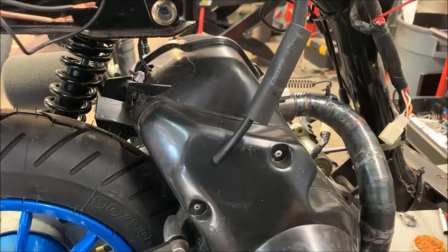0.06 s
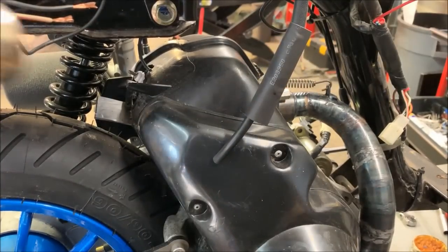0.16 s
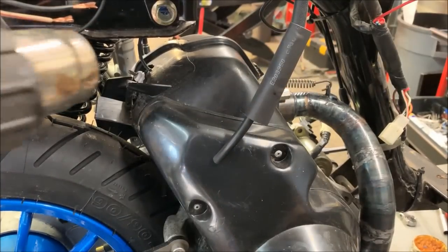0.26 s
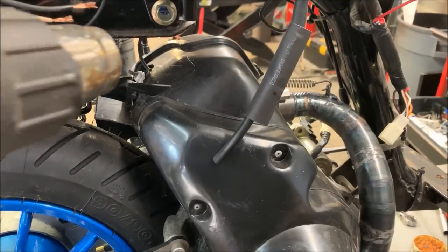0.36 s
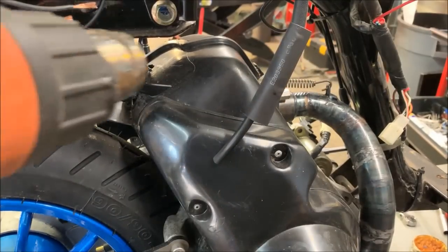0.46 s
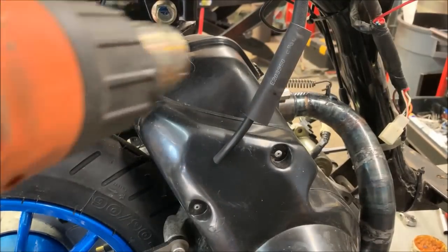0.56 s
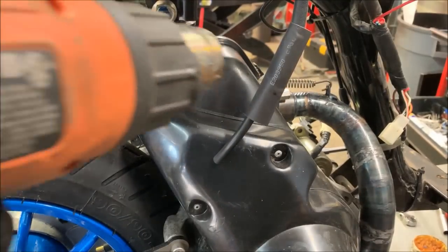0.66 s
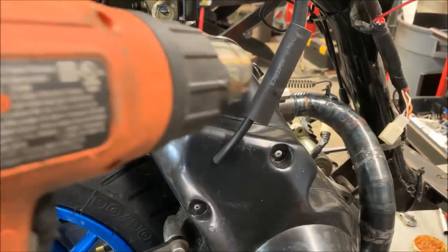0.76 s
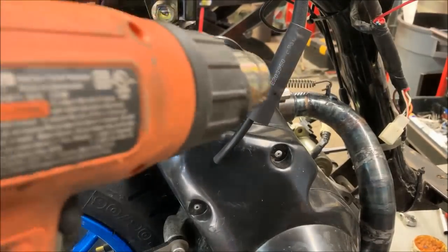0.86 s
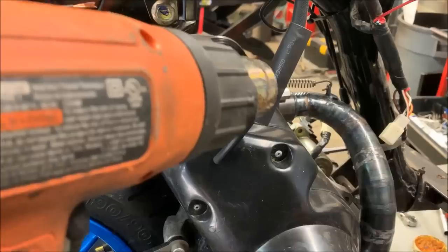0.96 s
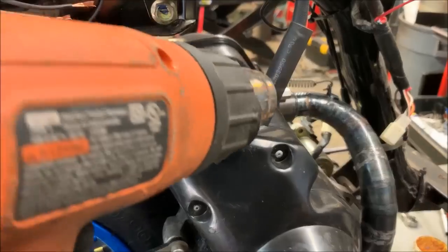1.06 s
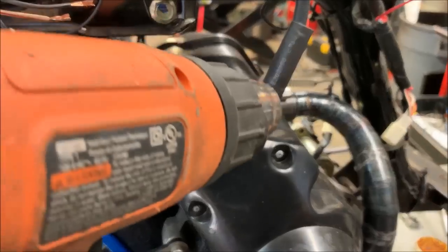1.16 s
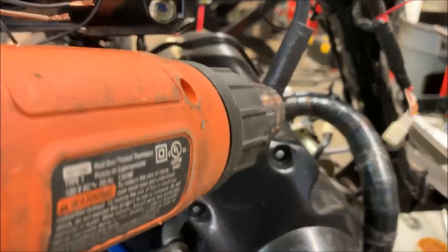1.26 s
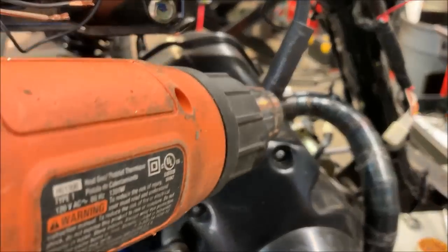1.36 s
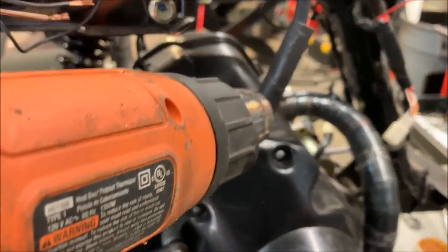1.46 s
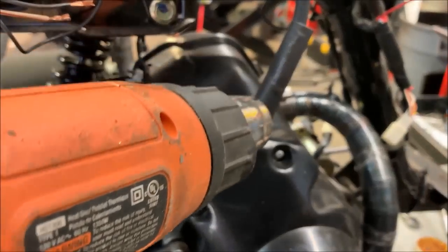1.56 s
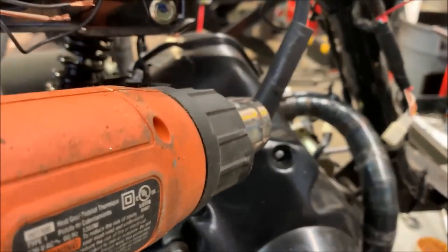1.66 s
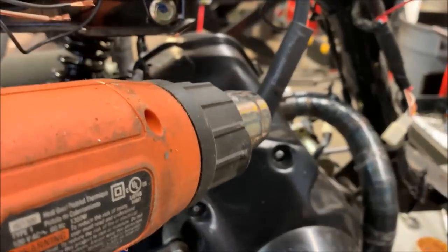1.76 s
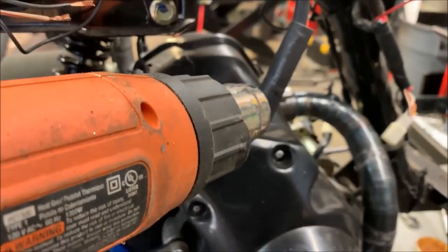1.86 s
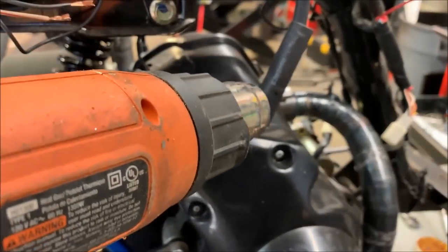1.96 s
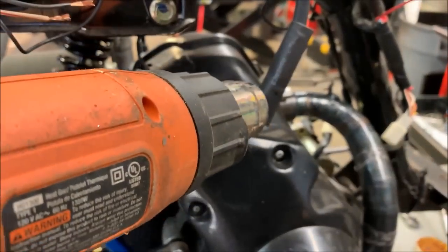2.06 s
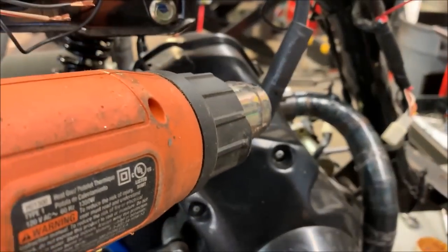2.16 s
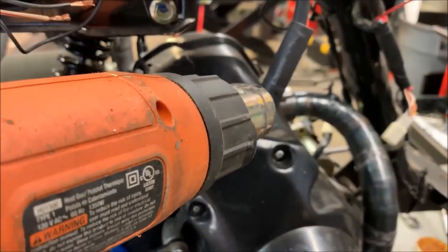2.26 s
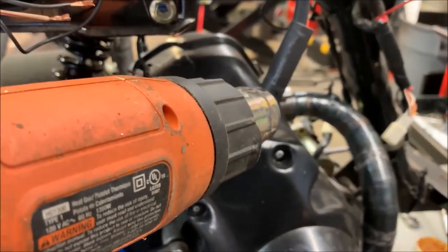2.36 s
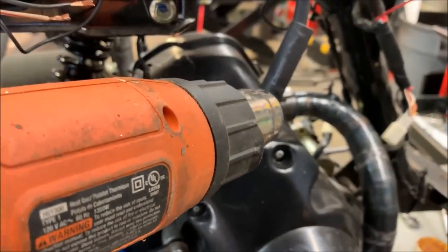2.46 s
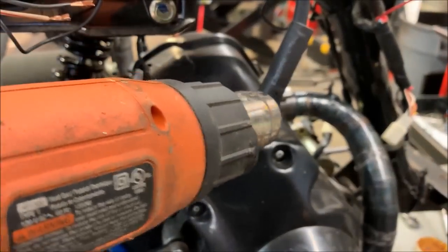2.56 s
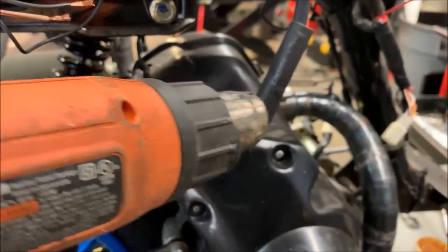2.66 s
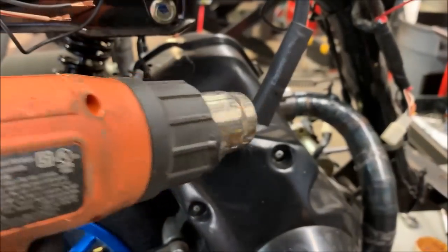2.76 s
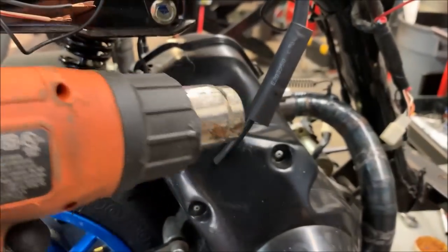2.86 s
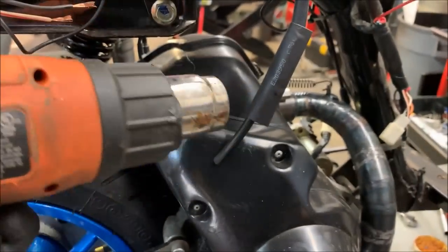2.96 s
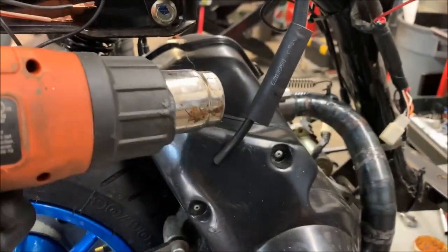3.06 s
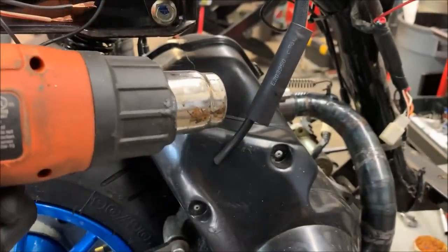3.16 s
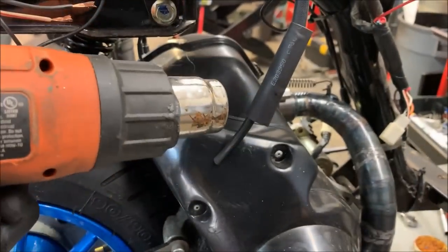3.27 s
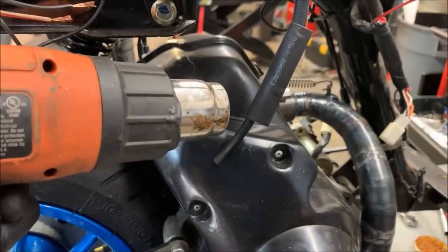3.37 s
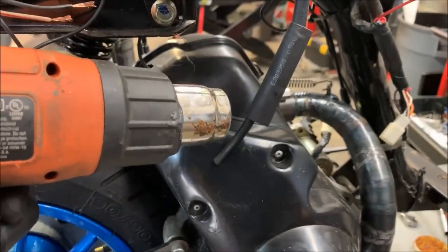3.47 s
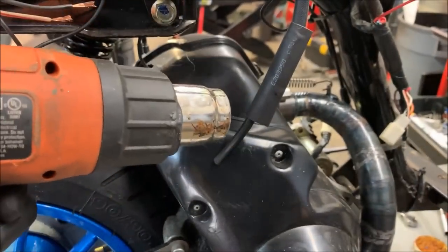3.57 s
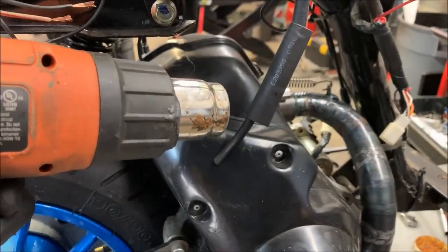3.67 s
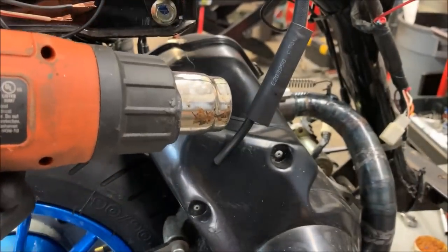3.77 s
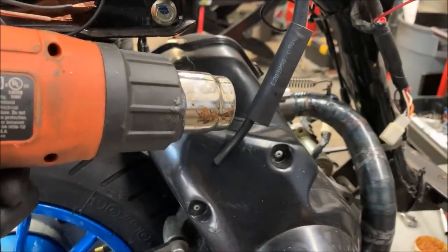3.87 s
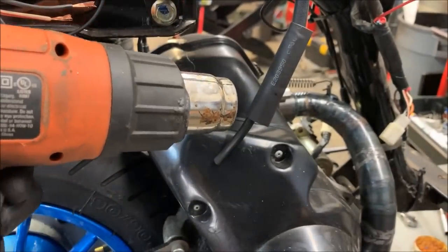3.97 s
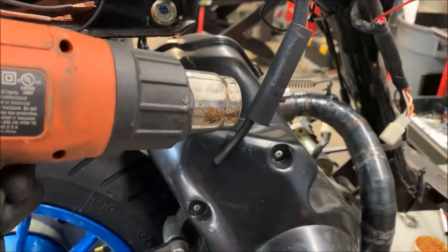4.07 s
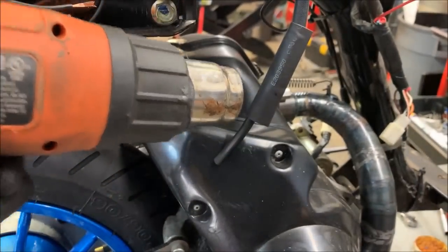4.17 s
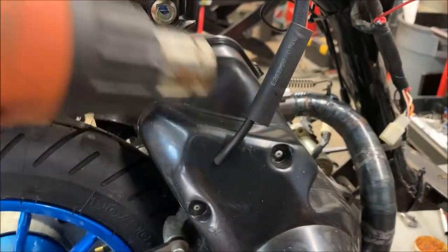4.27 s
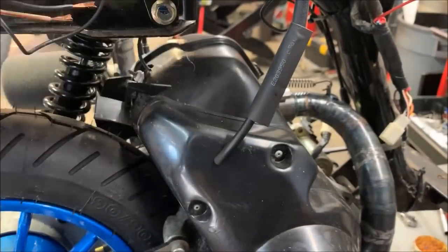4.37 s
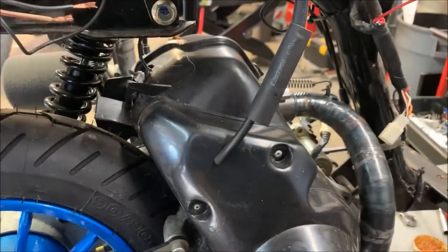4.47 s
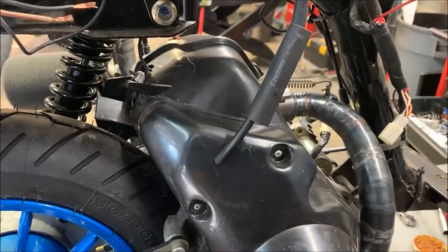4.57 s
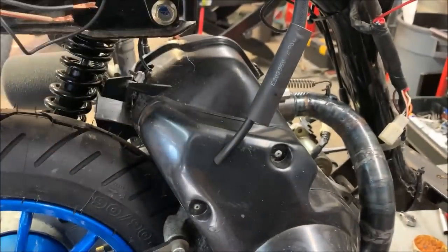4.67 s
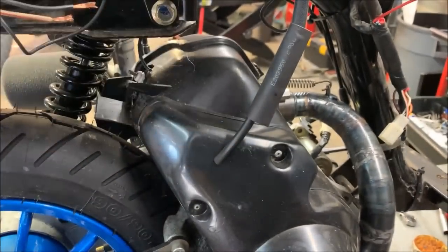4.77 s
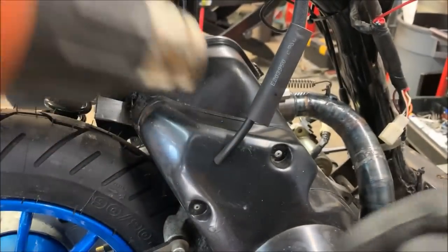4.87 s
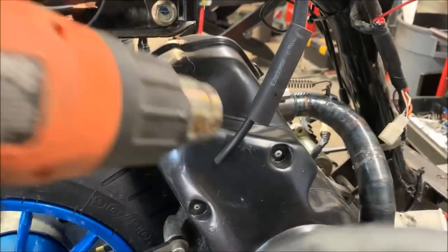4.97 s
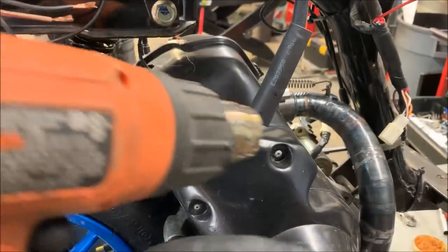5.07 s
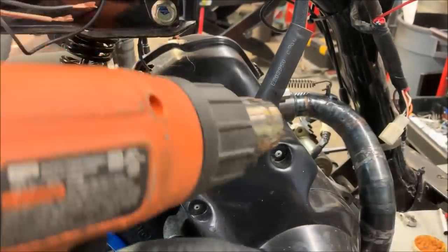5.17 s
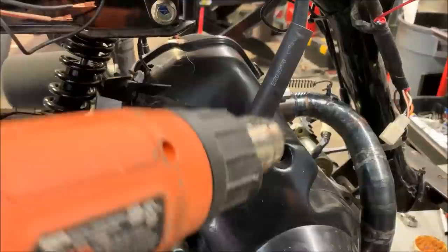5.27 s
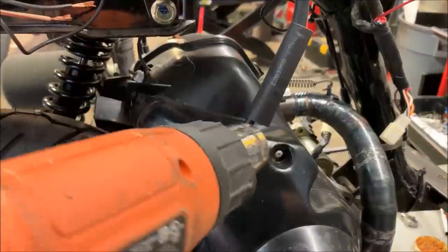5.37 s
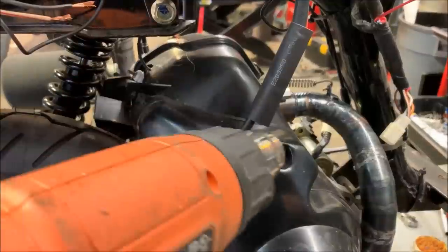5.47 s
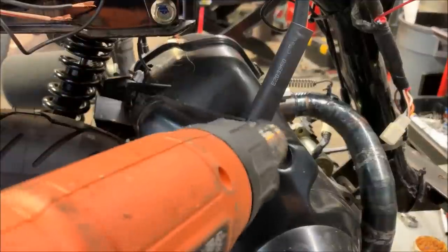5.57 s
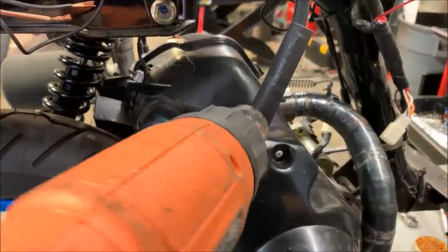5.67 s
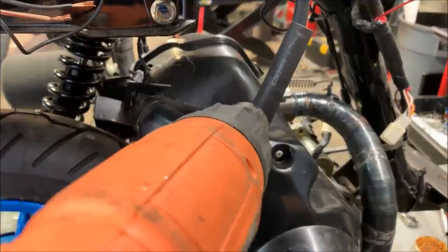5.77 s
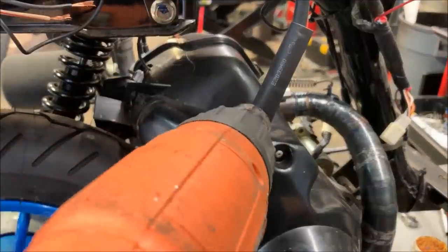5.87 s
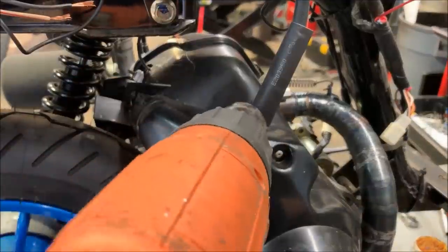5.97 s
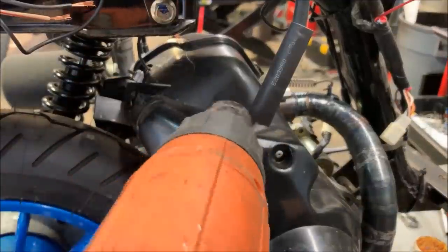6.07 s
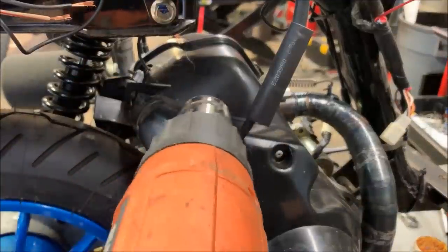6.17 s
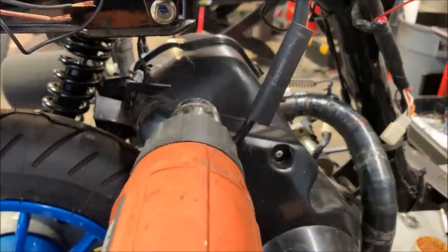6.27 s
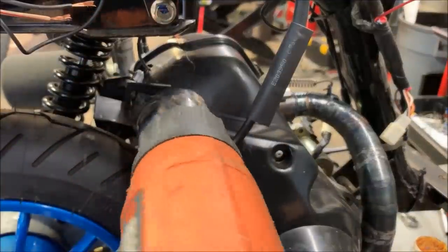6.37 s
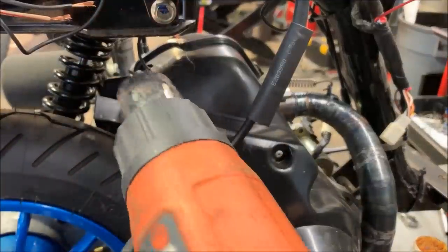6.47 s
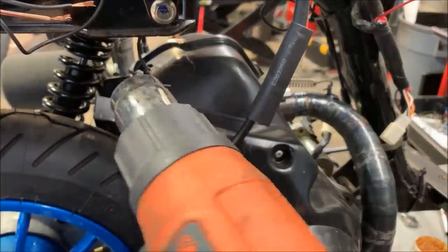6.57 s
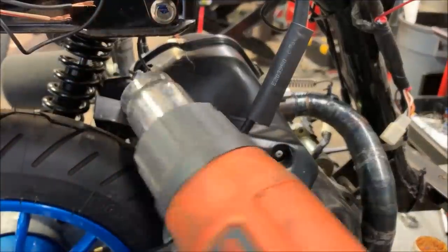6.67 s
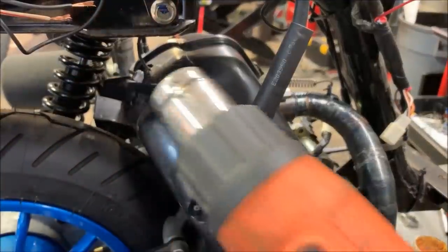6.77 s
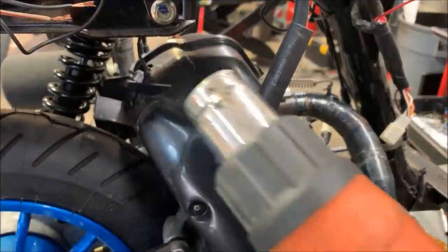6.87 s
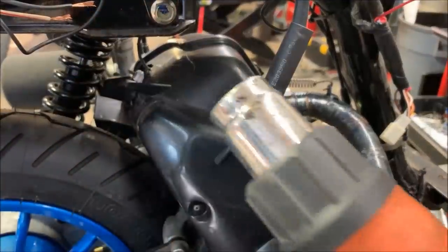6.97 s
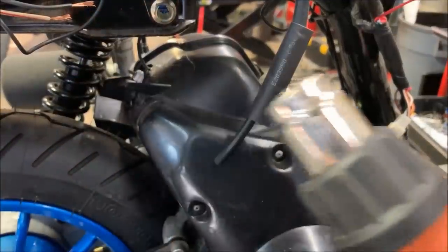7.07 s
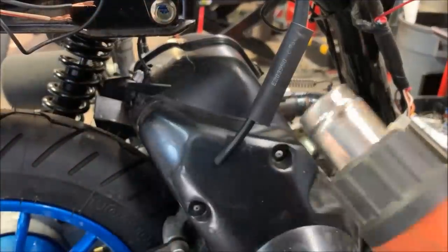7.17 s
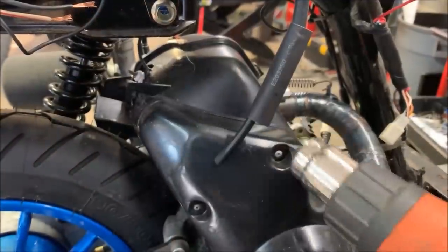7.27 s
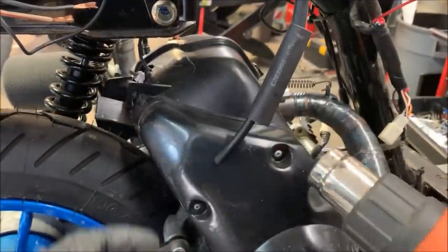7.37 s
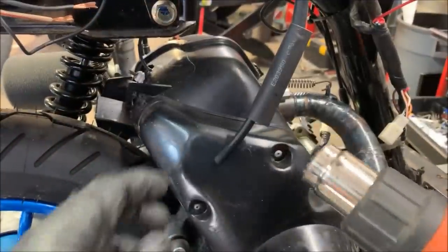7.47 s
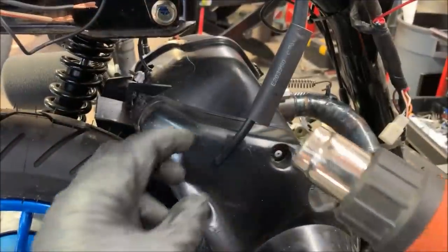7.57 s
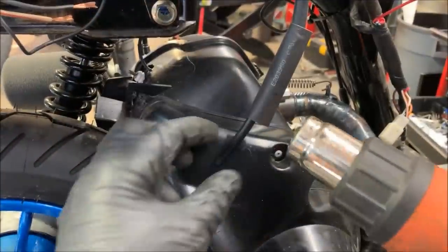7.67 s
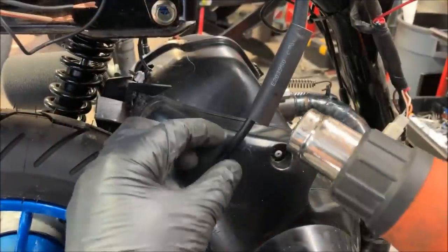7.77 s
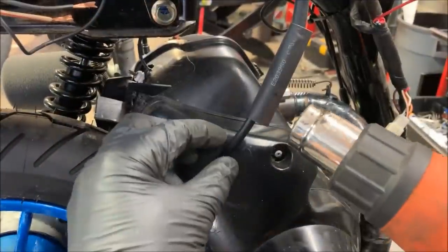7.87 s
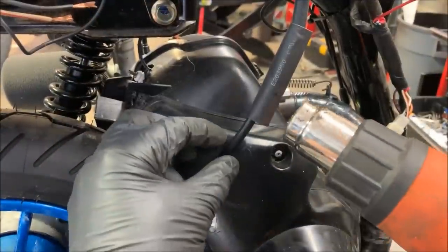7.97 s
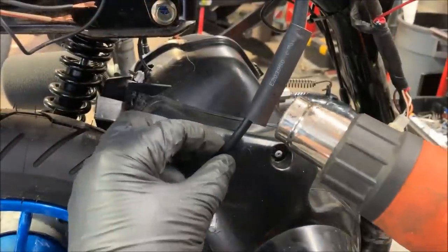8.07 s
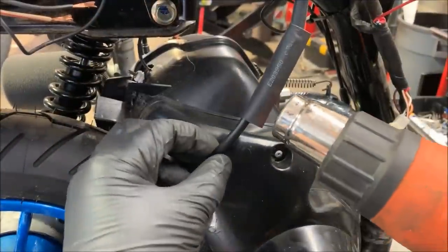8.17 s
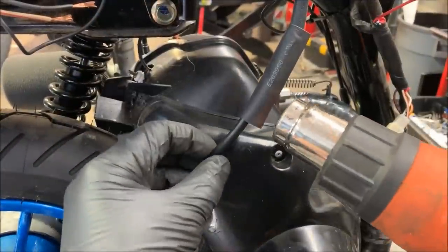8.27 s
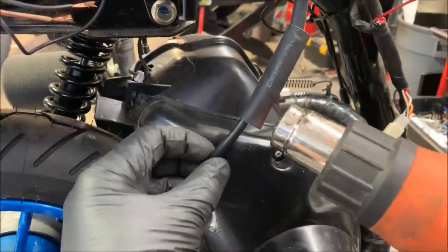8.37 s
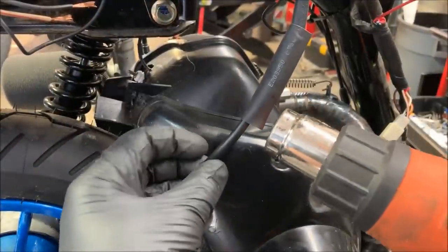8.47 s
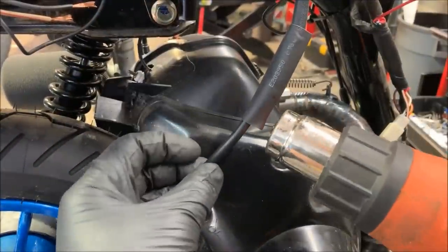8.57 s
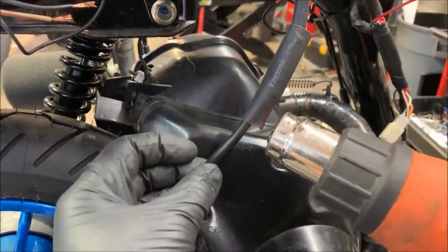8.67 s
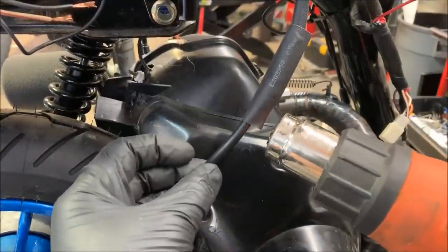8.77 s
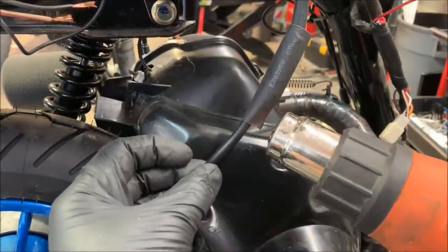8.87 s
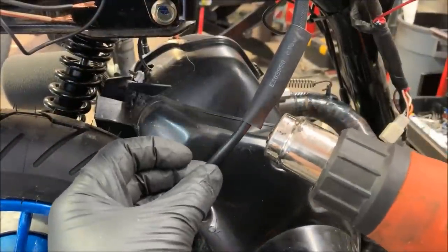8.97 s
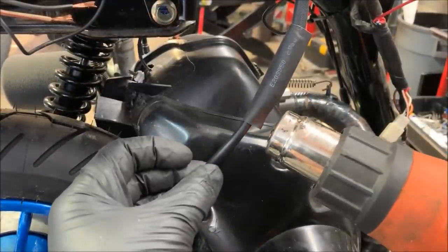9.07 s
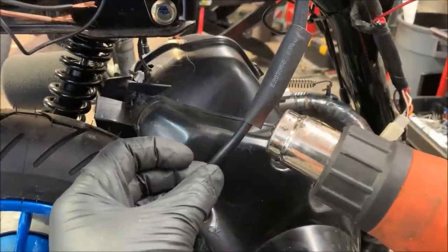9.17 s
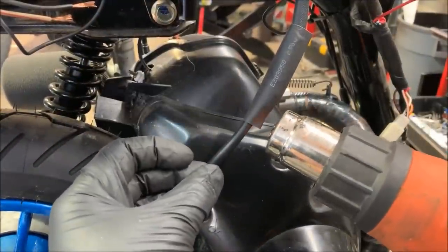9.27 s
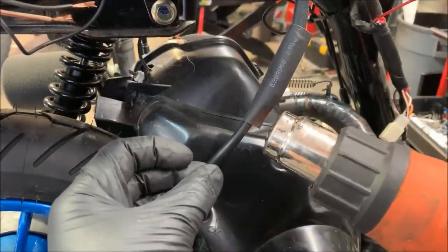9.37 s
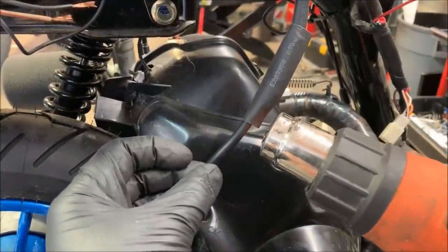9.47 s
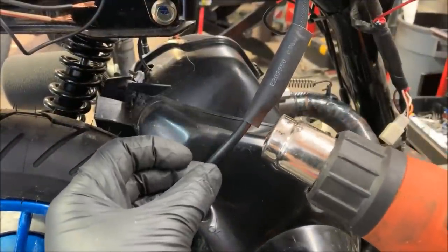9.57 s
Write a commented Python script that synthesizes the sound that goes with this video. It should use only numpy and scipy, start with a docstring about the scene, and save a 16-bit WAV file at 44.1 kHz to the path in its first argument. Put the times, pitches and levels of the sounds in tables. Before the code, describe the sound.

A heat gun switches on very near the microphone and its fan climbs quickly to full speed. The steady blowing noise mixes a hollow mid-range roar, bright hiss, a humming motor with a thin whine and a faint piercing squeal. Moving the tool around makes the colour swell, thin and swing mostly from left toward centre and right. Later it holds steady, with soft low puffs of air bumping the microphone, in a dry workshop.

```python
"""A hand-held electric heat gun spins up and blows, close to a two-port microphone in a quiet workshop.
Its turbulent air is noise shaped by barrel, intake, housing and nozzle resonances; shaft, blade and
commutator tones are sines at multiples of the shaft speed. A thin squeal of narrow noise sits on top.
The gun is carried around the microphone: each part swells and changes side. Below lie mains ripple,
a drone, a deep hum, puffs and buffeting on the microphone and the still room."""
import sys
import numpy as np
from scipy import signal
from scipy.io import wavfile
from scipy.ndimage import uniform_filter1d

SR = 44100
rng = np.random.default_rng(int(sys.argv[2]) if len(sys.argv) > 2 else 0)


def bounce(signal):
    """Save signal as a 16-bit WAV file at the path given by the first command-line argument."""
    frames = np.transpose(np.atleast_2d(signal))
    limited = np.clip(frames, -1, 1)
    pcm = np.round(limited * 32767).astype(np.int16)
    wavfile.write(sys.argv[1], SR, pcm)


N = 424241
SIZE, HOP = 1024, 256  # noise frames, samples
HZ = np.fft.rfftfreq(SIZE, 1 / SR)
FRAME_S = np.arange(N // HOP + 5) * HOP / SR
TIME = np.arange(N) / SR

# Place: air buffeting the microphone and the hum of the shop: t/s, level/dB
RUMBLE = [(0.0, -44.5), (1.42, -59), (1.71, -40.5), (3.83, -53), (3.99, -43), (4.07, -48), (5.57, -44.5),
          (6.78, -49), (8.09, -42), (8.14, -41), (8.28, -45), (8.33, -42), (9.03, -46), (9.62, -46)]
# spectrum of that buffeting: f/Hz, relative level/dB per Hz
RUMBLE_COLOUR = [(8.8, -35), (15, -5), (43, 6), (140, -1.5), (168, -25), (200, 6.5), (260, -9), (440, -120)]
# spectrum of the still room: f/Hz, relative level/dB per Hz
ROOM_COLOUR = [(76, -33), (130, -44), (307, -18.5), (1020, -28.5), (1220, -31), (2410, -23), (15500, -46.5)]
ROOM_DB = -49
# puffs of air on the microphone: t/s, peak level/dB, f/Hz
PUFFS = [(7.99, -40, 59.7), (8.136, -31, 49.4), (8.165, -32, 59.5), (8.245, -35, 90.2), (8.364, -24, 70),
         (8.383, -32, 49.9), (8.42, -29, 88.4), (8.5, -31, 80.5), (8.54, -38, 59.8), (8.665, -34, 50),
         (8.695, -27, 70.1), (8.845, -38, 50.3)]

# Stereo image of the hiss by pitch:
# f/Hz, left leads/rad, rms wander of the lead/rad, likeness of left and right/0-1
STEREO = [(0, 0, 0, .9), (500, .1, .1, .9), (1000, .2, .3, .9), (2200, 2.4, .4, .85), (3600, 1.6, .5, .75),
          (5000, 3.6, .8, .55), (6200, 4.2, 1.2, .5), (7300, 3, .8, .5), (8200, 1.3, .3, .6),
          (9000, .15, 0, .97), (9400, -.15, 0, .97), (10200, -1.5, 0, .5), (11100, -3, 0, .985),
          (11700, -3.3, 0, .985), (12500, -4.7, 0, .5), (13200, -6.15, 0, .995), (14000, -6.4, 0, .995),
          (14600, -7.7, 0, .55), (15100, -8.7, 0, .97), (15500, -9.3, 0, .85), (16000, -9.5, 0, .9)]
EDGE_HZ = 15790  # upper band limit of the recorder

# Distance and aim: how fast the hand carries the gun about: t/s, speed/0-1
HAND = [(0, 0.48), (1.1, 0.55), (1.3, 0.29), (2.6, 0.03), (2.85, 0.47), (3.1, 0.09), (4.1, 0.17),
        (4.35, 0.99), (5.3, 0.84), (5.7, 0.3), (6.4, 0.28), (6.6, 1), (7.5, 0.94), (7.7, 0.01), (9.62, 0)]
# where the parts lie: t/s, L-R level/dB of barrel, intake, housing, left leads/rad of intake, housing, nozzle
BEARING = [(0.3, 10, 10.5, 1, -4.5, -2.5, 0), (1.0, 11, 16, 1, -1, 0.5, -2),
           (1.25, 10, 20, 5.5, -0.5, -2, -4), (2.6, 8, 16, 0.5, 2, 0, -4), (3.15, 8, 9, 9.5, 1, 4, -1),
           (4.1, 7.5, 5.5, 9.5, -2, 4.5, -1.5), (4.3, 8, 7, 5.5, -1.2, 4, -1.5),
           (4.6, 15, 9, 4.5, -2.5, 4.5, 2), (4.85, 15, 10, 8, -8.5, 2.5, 1.5),
           (5.2, 7, 13, 1, -7.5, 1, -2.5), (5.5, 7, 13.5, 6, -8, -0.5, -2.5),
           (5.9, 5.5, 10.5, 7.5, -7, -2, -6), (6.4, 5, 6.5, 3, -5.5, -2.5, -9.5),
           (6.8, 1.5, 2, 4, -7.5, -1.5, -5.5), (7.1, 0, -7, 5, -2, -5, -5), (7.35, -3, -5, 6, -5.5, -6, -6),
           (7.8, -3.5, -5, 6.5, -5.5, -5, -5), (9.62, -1.5, -4, 5, -4.5, -8.5, -4)]
# ridge and flank: t/s, ridge L-R level/dB, ridge left leads/rad,
# flank level/dB above the jet, flank L-R level/dB, flank left leads/rad
FLANKS = [(0.3, 4, 4.5, -11, 5, 4), (1.0, 4.5, 2, -21, -3, -8.5), (2.6, 2, 1.5, -9, 7, -4),
          (4.1, 5, 1.5, -11, 3, -0.5), (4.55, 0, 1, -12, 5, -2.5), (4.9, 6, 0.5, -9.5, 9, -5.5),
          (5.3, 1, 2, -9, 8, -7.5), (5.8, 12, -0.5, -11, 4, -4), (6.2, 5, -2, -14, 6, -6),
          (6.8, 5, -5.5, -8, 12, -7), (7.3, 3, -11, -12, 2, -6.6), (7.8, 1, -13, -14, -5, -7.5),
          (9.62, 2, -12.5, -12.5, -3, -5.5)]
# turning shifts the housing and nozzle modes and bares the nozzle: t/s, housing f/Hz, housing width/Hz,
# nozzle f/Hz, nozzle width/Hz, nozzle level/dB above the jet
TURN = [(0.2, 1890, 500, 4040, 700, -5), (1.0, 1950, 540, 4180, 700, -2.5), (2.6, 2050, 550, 4150, 800, -7),
        (2.85, 1860, 500, 4230, 800, -5.5), (4.3, 1890, 450, 4373, 700, -6.5),
        (4.4, 1850, 450, 4240, 450, -3), (4.5, 1910, 450, 4100, 450, -3), (4.58, 1920, 450, 4230, 800, -8),
        (4.75, 1801, 600, 4050, 600, -7.5), (4.9, 1770, 600, 4000, 400, -3),
        (4.97, 1800, 600, 4200, 400, -2.5), (5.05, 1830, 600, 4410, 450, -6.5),
        (5.25, 1934, 600, 4240, 800, -10), (5.6, 1814, 500, 4130, 800, -1.5),
        (6.4, 1923, 500, 4080, 900, -1.5), (6.7, 1780, 602, 4200, 1000, 2),
        (7.0, 1830, 500, 4180, 900, -2.5), (7.15, 1810, 400, 4170, 790, -5.5),
        (7.27, 2000, 350, 4000, 804, -8), (7.31, 1603, 450, 4000, 693, -2.5),
        (7.45, 1720, 450, 4170, 800, 1.5), (7.8, 1738, 549, 4200, 800, -9.5),
        (9.62, 1715, 557, 4222, 800, -6)]
# turning shifts the barrel modes and hides the lowest: t/s, f factor, lowest mode level/dB above the barrel
AIM = [(0.15, .98, -12), (0.45, 0.94, -15), (0.7, 0.96, -3), (1.0, 1.04, -6), (2.6, 1.034, -6.5),
       (3.2, 1.016, -9.5), (4.4, 1.005, -7.5), (5.0, 0.98, -4.5), (5.6, 1.04, -8), (6.5, 1.02, -8.5),
       (6.9, 1.06, -14), (7.2, 1.04, -27), (7.6, 1.03, -24), (8.0, 1.036, -28), (9.62, 0.99, -18)]
# offset (dB for a side, rad for a lead) and share of the neighbour's L-R level/dB
JET_SIDE, HISS_SIDE = (1.6, 0.12), (-1.7, 0.099)  # follow the intake
BARREL_LEAD, THIRD_LEAD = (-0.26, 0.12), (-0.3, 0.1)  # follow the barrel, as do the sides below
THIRD_SIDE, WHINE_SIDE, LOWEST_SIDE = (-5, 2.4), (-2, 0.44), (0, 0.092)
JET_LEAD, THIN_LEAD = 1.84, 1.4  # left leads, rad

# Mains ripple in the motor: t/s, ripple level/dB, twice the ripple level/dB, shaft minus ripple level/dB
RIPPLE = [(0.5, -64, -60, -62), (1.0, -63, -60, -53), (2.2, -51.5, -59, -51.5), (2.9, -54, -58, -55),
          (3.3, -62, -60, -54), (4.2, -60, -57, -57), (4.6, -62, -58, -58), (5.3, -57, -50, -51),
          (6.1, -50, -59, -58.5), (7.1, -60, -58, -56), (8.5, -63, -54, -63), (9.62, -59, -57, -64)]
RIPPLE_HZ = 120  # rectified mains
# a low steady drone: t/s, f/Hz, level/dB
DRONE = [(0.3, 78, -58), (1.0, 78, -52), (1.8, 76.6, -48), (2.4, 75.4, -53), (3.1, 74.6, -56),
         (3.5, 74, -70)]
# a deep, fuzzy hum that comes and goes: t/s, level/dB
DEEP = [(1.2, -66), (1.7, -56), (2.5, -45), (2.9, -62), (4.5, -62), (5.0, -47), (5.6, -50), (6.0, -66),
        (9.62, -66)]
DEEP_HZ, DEEP_WIDTH_HZ = 48.5, 11

# A thin squeal, perhaps the brushes: t/s, level/dB
SQUEAL = [(0.44, -28), (0.55, -30), (1.1, -25), (1.3, -36), (1.5, -50), (1.9, -37), (2.7, -39.5),
          (2.95, -30), (3.3, -35), (3.5, -30), (4.3, -32), (4.7, -58), (5.1, -30), (5.35, -42), (5.9, -39),
          (6.45, -31), (7.05, -45), (7.3, -40), (7.65, -44), (8.1, -37), (9.05, -37), (9.62, -45)]
# pitch of the squeal: t/s, f/Hz
SQUEAL_HZ = [(0, 15092), (2.5, 15065), (5, 15050), (7, 15012), (7.6, 14965), (9.62, 14950)]
# faint ticks of hiss as the motor starts: t/s, length/s, f/Hz, width/Hz, level/dB before the fades
TICKS = [(0.069, .02, 5050, 3000, -43), (.172, 0.0092, 12800, 1200, -45), (.2, .006, 7000, 6000, -58),
         (0.222, .04, 15000, 300, -35), (0.229, .032, 13500, 4000, -52)]
STEADY = .6  # share of a whistle's level swings that is evened out

# Shaft once up to speed: t/s, f/Hz
RUNNING = [(1.5, 293.3), (2.1, 293.6), (2.85, 293.6), (3.3, 293.1), (4.2, 293.6), (4.4, 294.1),
           (4.8, 293.6), (5.25, 294.7), (5.9, 294.7), (6.45, 294.3), (6.7, 293.4), (7.2, 293.3),
           (7.45, 291.9), (7.7, 292.0), (8.4, 292.9), (9.0, 293.2)]
# torque against fan drag: speed = running speed x tanh((t + HEAD_START_S) / SPIN_UP_S)
HEAD_START_S, SPIN_UP_S = .07, .866
AIR_POWER, TONE_POWER = 3.3, 2.4  # amplitude goes as the spin-up fraction to this power

# Tones at full speed: t/s, 3rd order level/dB, 8 blades level/dB, blades L-R level/dB,
# blades left leads/rad, order 16 left leads/rad, order 24 level/dB, order 30 level/dB
TONES = [(0.6, -51, -44, 7, 3.8, -1.8, -53, -49), (0.75, -46, -44, 3, 1.5, -1.8, -52, -48),
         (0.9, -47, -31, 1, .1, -1.8, -50, -49), (1.2, -48, -39, 18, .4, -1.3, -56, -50),
         (1.5, -50, -35, 10, .4, -1.1, -55, -45), (2.0, -53, -36, 2, .7, -1.3, -44, -41.5),
         (2.78, -52, -38, 0, 1, -.8, -44, -40), (3.0, -52, -41, -1, 3.3, .7, -54, -43),
         (4.2, -58, -38.5, -.5, 3.3, .6, -60, -41.5), (4.5, -60, -35, 2.5, 4.7, -1.1, -61, -42),
         (4.9, -60, -35, 4, 4.9, -.6, -51, -43), (5.02, -58, -48, 2, 6.2, -.6, -48, -39),
         (5.16, -56, -35.5, .5, 7.5, -.6, -46, -36), (5.65, -41, -37, 1, 7.6, -3.5, -51, -37),
         (6.05, -42.5, -38.5, 1, 8.3, -3.4, -52, -47.5), (6.7, -36, -42, 0, 8, -3.8, -52, -43),
         (7.15, -44, -49.5, 4.5, 10.2, -4.6, -60, -49), (7.52, -53, -48, 3.5, 10.4, -5.2, -55, -49),
         (7.7, -50, -37.5, 2.5, 10.5, -5.3, -46, -49.5), (8.45, -48, -37.5, 7.5, 10.5, -5.3, -43.5, -48),
         (8.8, -44, -39, 7, 10.5, -5.2, -53, -48), (9.62, -45, -39.5, 4.5, 10.5, -5.2, -57.5, -52.5)]
# more tones at full speed: t/s, shaft level/dB, 2nd order level/dB, order 16 level/dB, order 24 left leads/rad
HUM = [(0.45, -40, -56, -52, 0), (0.75, -41, -57, -51, 0), (1.05, -44, -47, -43, 0),
       (1.3, -44, -46, -41, 0), (1.5, -42, -46, -47, 0), (1.7, -44, -46, -43, 0), (2.1, -45, -43.5, -53, 0),
       (2.4, -43.5, -43, -47, -.3), (2.7, -45, -48, -49, -.5), (3.0, -52, -48, -50, -2.5),
       (4.05, -52, -51, -49, -2), (4.3, -49, -48, -56, 1), (4.5, -44, -44, -52, 1.5),
       (4.85, -53, -48, -45, 1), (5.15, -50, -44, -48, -1.5), (5.5, -44, -43, -42.5, -4),
       (5.9, -43.5, -41.5, -45, -3), (6.15, -46, -41, -51, -2.5), (6.4, -49, -40, -46, -2),
       (6.75, -53, -42, -44, -3), (7.05, -54, -46.5, -48, -4), (7.3, -56, -52, -59, -3),
       (7.55, -46, -62, -48, -3), (8.05, -53, -57, -47, -2.8), (8.35, -49, -55, -55, -2.8),
       (8.7, -52, -55, -48.5, -3), (9.62, -53, -57, -47.5, -3.3)]
# thin upper mids at full speed: t/s, level/dB of order 19, order 20, order 25
THIN = [(0.6, -62, -58, -60), (1.0, -64, -52, -53), (1.13, -65, -44, -52), (1.35, -66, -42, -49),
        (1.52, -62, -50, -53), (1.9, -60, -62, -55), (2.6, -53, -60, -50), (3.5, -60, -55, -47),
        (4.0, -60, -60, -49), (4.5, -60, -60, -54), (5.7, -53, -58, -53), (6.5, -58, -55, -59),
        (7.5, -64, -62, -66), (8.5, -55, -62, -66), (9.62, -54, -64, -66)]
# weaker orders: order, level/dB against the treble, before the casing lift
FAINT = [(32, -40), (36, -34), (37, -34), (38, -35), (45, -29), (48, -25), (50, -26), (52, -33), (56, -27),
         (64, -26)]
# casing modes that lift passing high orders: f/Hz, width/Hz, lift/dB
CASING = [(9350, 1300, 21), (10900, 900, 6), (13400, 900, 9)]
FOURTH_DB = -20  # above the intake
ORDER_35_DB, ORDER_40_DB = -11, -53  # before the casing lift; order 35 is above order 30

# Air at full speed: t/s, level/dB of barrel, intake, housing, whoosh, jet, treble
LEVELS = [(0.1, -17, -32, -8, -33, -34, -35), (0.22, -22, -36, -15, -29, -31, -35),
          (0.33, -32, -31, -26, -28, -28, -35), (0.42, -26, -27, -30, -35, -29, -36),
          (0.46, -27, -28, -34, -33, -27.5, -31), (0.54, -28, -29, -30, -28, -27.5, -31),
          (0.6, -29, -30, -32, -30, -27.5, -31.5), (0.72, -29, -28, -28, -34, -28, -31),
          (1.0, -29.5, -31.5, -31, -36.5, -31.5, -30.5), (1.6, -32, -33.5, -31.5, -37, -32, -32.5),
          (2.65, -32.5, -31, -37.5, -40, -30.5, -32.5), (3.1, -34, -38, -36, -43, -34, -34.5),
          (4.15, -34.5, -36, -39, -44, -33, -35), (4.42, -32.5, -35, -31.5, -38.5, -29.5, -34.5),
          (4.52, -36.5, -36, -28, -41, -33, -35), (4.62, -40.5, -41, -31.5, -41, -32.5, -38.5),
          (4.75, -37.5, -48, -33, -42, -31, -36.5), (5.08, -35, -32.5, -34.5, -43, -30.5, -32.5),
          (5.4, -32, -31.5, -38.5, -38.5, -31, -34), (5.8, -30.5, -28, -34.5, -45, -32, -34),
          (6.2, -31.5, -25, -31, -39, -34, -34.5), (6.55, -30.5, -26.5, -34.5, -43, -32.5, -34.5),
          (6.84, -26.5, -30, -34.5, -41, -33.5, -35), (6.95, -28.5, -39, -28.5, -45, -32.5, -36),
          (7.15, -29.5, -37, -31, -44, -33, -35.5), (7.26, -34.5, -41, -31.5, -44, -32, -38.5),
          (7.29, -33, -40, -42, -39, -32.5, -37), (7.36, -33, -43, -32, -50, -33.5, -37),
          (7.5, -34, -41.5, -34, -42, -34.5, -39), (7.9, -34, -43, -37.5, -41.5, -32, -37),
          (8.6, -32.5, -41.5, -38, -41, -33, -36.5), (9.62, -33, -42, -36, -42.5, -32, -37)]
# resonances of each part of the air: f/Hz, width/Hz, relative level/dB
BARREL = [(751, 168, 5.5), (880, 190, -2)]
INTAKE = [(1094, 224, 1.1), (1244, 137, 1.9)]
WHOOSH = [(174, 130, -0.5), (295, 740, 6), (388, 120, -3.5)]
JET = [(2590, 1400, -2.5), (2890, 1100, -5.5), (3740, 1700, -9), (4630, 250, -7.5)]
HISS = [(5540, 1300, -0.69), (6420, 1700, -1), (6870, 410, -0.87), (7840, 1850, -1.8), (8780, 360, -0.84)]
FIZZ = [(9600, 2500, -4.5), (10820, 580, 2.5), (11960, 2000, 1.5), (13800, 1400, 1.5), (14730, 1000, 5.5),
        (15500, 500, -12)]
FLANK = [(1467, 160, 0)]  # a mode between intake and housing
LOWEST = [(612, 200, 0)]  # lowest barrel mode
SHEEN_LOW, SHEEN_HIGH = [(8270, 580, 0)], [(9660, 2100, 0)]
# treble bands that trade places as the gun turns: t/s, lower level/dB, upper level/dB above the treble
SHEEN = [(0.3, -21, 1.5), (1.5, -11, -3.5), (2.7, -5, -13), (3.0, -11, -7), (4.4, -3, -7), (5.0, -6, -10),
         (5.7, -14, -7), (6.5, -9, -23), (7.5, -5, -6), (8.3, -11, -21), (8.6, -2, -18), (9.62, -1.5, -10)]
# narrow ridge in the jet that slides as the nozzle swings: t/s, f/Hz, level/dB above the jet
RIDGE = [(0.3, 2840, -7), (0.6, 2950, -4), (1.1, 3170, -1.5), (1.8, 3220, -7), (2.6, 3208, -6.5),
         (2.85, 2980, -2.5), (3.0, 3160, -5.5), (4.2, 3194, -5.5), (4.4, 2720, -15), (4.55, 2900, -0.5),
         (4.68, 3120, -11), (4.78, 3190, -8), (5.05, 3170, -13), (5.2, 3130, -5), (5.35, 2900, 2),
         (5.47, 3230, -8), (6.0, 3220, -8), (6.4, 3098, -8), (6.72, 3250, -6), (6.95, 2900, -15),
         (7.12, 2800, -17), (7.3, 2908, -12), (7.7, 3250, -12), (9.62, 3180, -11.5)]
RIDGE_WIDTH_HZ = 350
HISS_DB, FIZZ_DB = 1.34, 0.4  # above the treble level
PATCH_DB = .6  # rms depth of the random patches


def gain_of(db):
    """dB to amplitude."""
    return 10 ** (np.asarray(db) / 20)


def evened(x):
    """Scales to rms 1."""
    return x / np.sqrt(np.mean(x ** 2) + 1e-20)


def columns(rows, t):
    """Reads every column of a curve table at the times (or frequencies) t."""
    s, *values = np.transpose(rows)
    return [np.interp(t, s, v) for v in values]


def sides(db, pan_db=0.):
    """Gains of the left and right port, pan_db apart."""
    return np.array([gain_of(db + pan_db / 2), gain_of(db - pan_db / 2)])


def follow(rule, control):
    """An offset plus a share of a control."""
    return rule[0] + rule[1] * control


def random_curve(points, step_s):
    """A random level curve of straight lines between normal draws step_s apart."""
    return np.interp(TIME, np.arange(points) * step_s, rng.standard_normal(points))


def smooth(points):
    """Power per bin of a spectrum table, summing to 1."""
    hz, db = np.transpose(points)
    power = gain_of(np.interp(np.log(HZ + 1), np.log(hz + 1), db, -99, -99)) ** 2
    return power / power.sum()


def ringing(modes):
    """Power per bin of steep-sided resonances, summing to 1; a centre may be a curve over frames."""
    power = 0
    for hz, width, db in modes:
        detuning = 2 * (HZ[:, None] - hz) / width
        power = power + gain_of(db) ** 2 / (1 + detuning ** 2) ** 2
    return power / power.sum(0)


def tone(turns, gains, lead):
    """One sine at both ports, of rms 1 before the gains, the left leading by lead rad."""
    return np.sqrt(2) * gains * np.sin(2 * np.pi * turns + np.array([lead, -lead]) / 2)


def whistle(hz, width, gain):
    """Narrow noise around the curve hz: a partly evened random envelope on a carrier, phased left to right."""
    r = np.exp(-np.pi * width / SR)
    draws = rng.standard_normal(N) + 1j * rng.standard_normal(N)
    slow = signal.lfilter([1], [1, -2 * r, r * r], draws)
    slow = slow / (abs(slow) + 1e-9) ** STEADY
    carrier = np.exp(2j * np.pi * np.cumsum(hz * np.ones(N)) / SR)
    wave = slow / np.sqrt(np.mean(abs(slow) ** 2)) * carrier
    lead = columns(STEREO, hz)[0]
    return np.sqrt(2) * gain * np.array([wave.real, (wave * np.exp(-1j * lead)).real])


def shaft_hz(t):
    """Fan shaft speed: torque against drag brings it up along a tanh."""
    return columns(RUNNING, t)[0] * np.tanh((t + HEAD_START_S) / SPIN_UP_S)


def spin_db(t, power):
    """Level against full speed during spin-up, a power law of the speed fraction."""
    return power * 20 * np.log10(np.tanh((t + HEAD_START_S) / SPIN_UP_S))


def background():
    """Power of the place: low buffeting of varying level over the steady still room."""
    buffet = smooth(RUMBLE_COLOUR)[:, None] * gain_of(columns(RUMBLE, FRAME_S)[0]) ** 2
    return buffet + smooth(ROOM_COLOUR)[:, None] * gain_of(ROOM_DB) ** 2


def puffs():
    """Each puff of air pushes both ports once, with a swing back on either side."""
    out = 0
    for s, db, hz in PUFFS:
        since = TIME - s
        out = out + gain_of(db) * np.cos(2 * np.pi * hz * since) * np.exp(-(1.6 * hz * since) ** 2)
    return out


def ripple():
    """Mains ripple hums and beats against the shaft; a drone and a deep hum lie under it."""
    once, twice, beat = columns(RIPPLE, TIME)
    drone_hz, drone = columns(DRONE, TIME)
    lines = [(RIPPLE_HZ, once), (2 * RIPPLE_HZ, twice),
             (shaft_hz(TIME) - RIPPLE_HZ, beat), (drone_hz, drone)]
    centre = np.zeros(N)
    out = whistle(DEEP_HZ, DEEP_WIDTH_HZ, gain_of(columns(DEEP, TIME)[0]))
    for hz, db in lines:
        waver_db = 2.5 * random_curve(70, .15)
        turns = np.cumsum(hz + centre) / SR + rng.random()
        out = out + tone(turns, sides(db + waver_db), centre)
    fade_in = np.clip(2 * TIME, 0, 1) ** 2
    return fade_in * out


def squeal():
    """Narrow noise that sets in abruptly, gliding in pitch; short ticks of wider noise come before it."""
    onset = np.clip((TIME - SQUEAL[0][0]) / .01, 0, 1)
    out = whistle(columns(SQUEAL_HZ, TIME)[0], 60, gain_of(columns(SQUEAL, TIME)[0]) * onset)
    for s, length, hz, width, db in TICKS:
        to_edge = np.minimum(TIME - s, s + length - TIME)
        out += whistle(hz, width, gain_of(db) * np.clip(to_edge / 0.011, 0, 1))
    return out


def casing_lift_db(order, speed):
    """Lift of an order as it passes the casing modes."""
    return sum(top / (1 + (2 * (order * speed - hz) / width) ** 4) for hz, width, top in CASING)


def motor():
    """Shaft, blade and commutator tones: sines at whole multiples of shaft speed, each fluttering in level."""
    speed = shaft_hz(TIME)
    turns = np.cumsum(speed) / SR
    _, intake, _, _, _, treble = columns(LEVELS, TIME)
    shaft, second, o16, o24_lead = columns(HUM, TIME)
    barrel_pan, intake_pan, _, intake_lead, _, _ = columns(BEARING, TIME)
    third, blade, blade_pan, blade_lead, o16_lead, o24, o30 = columns(TONES, TIME)
    # order, level/dB, L-R level/dB
    orders = [(1, shaft, 0), (2, second, barrel_pan / 2), (3, third, follow(THIRD_SIDE, barrel_pan)),
              (4, intake + FOURTH_DB, intake_pan), (8, blade, blade_pan), (16, o16, 0), (24, o24, 0),
              (30, o30, follow(WHINE_SIDE, barrel_pan)),
              (35, o30 + ORDER_35_DB + casing_lift_db(35, speed), 0),
              (40, ORDER_40_DB + casing_lift_db(40, speed), 0)]
    orders += [(order, db, 0) for order, db in zip((19, 20, 25), columns(THIN, TIME))]
    for order, db in FAINT:
        swell_db = 2.2 * random_curve(40, .3)
        orders.append((order, treble + db + swell_db + casing_lift_db(order, speed), 0))
    thin = THIN_LEAD + 0 * TIME
    leads = {3: follow(THIRD_LEAD, barrel_pan), 4: intake_lead, 8: blade_lead, 16: o16_lead,
             19: thin, 20: thin, 24: o24_lead, 25: thin}
    out = 0
    for order, db, pan in orders:
        flutter_db = 2.2 * random_curve(250, .04)
        flutter_db += 2.4 * random_curve(1000, .01)  # roughness
        lead = leads[order] if order in leads else columns(STEREO, order * speed)[0]
        out = out + tone(order * turns + rng.random(), sides(db + flutter_db, pan), lead)
    return out * gain_of(spin_db(TIME, TONE_POWER))


def drifting(long_s, wide_hz):
    """A random field of rms 1 over frequency and time, smoothed twice over the given stretch."""
    field = rng.standard_normal((len(FRAME_S), len(HZ))).T
    for _ in range(2):
        field = uniform_filter1d(field, max(1, round(long_s * SR / HOP)), 1)
        field = uniform_filter1d(field, max(1, round(wide_hz / HZ[1])), 0)
    return evened(field)


def with_the_hand(field):
    """Runs a field fast while the gun is carried about and almost stops it while it is held."""
    travelled = np.cumsum(columns(HAND, FRAME_S)[0])
    return field[:, travelled.astype(int) - 1]


def noise(power, cross):
    """Turns power per port and the parts' summed phase leads into partly alike noise at both ports."""
    _, wander, likeness = columns(STEREO, HZ)
    same = np.clip(likeness[:, None] * abs(cross) / np.sqrt(power[0] * power[1]), 0, 1)
    lead = np.angle(cross) + wander[:, None] * with_the_hand(drifting(.12, 200))
    a, b, c, d = rng.standard_normal((len(FRAME_S), len(HZ), 4)).T
    left, other = a + 1j * b, c + 1j * d
    right = np.exp(-1j * lead) * (same * left + np.sqrt(1 - same ** 2) * other)
    bins = np.array([left, right]) * np.sqrt(power)
    unit = np.sqrt(3 / 2)  # a Hann frame seen four times over
    return unit * signal.istft(bins, nperseg=SIZE, noverlap=SIZE - HOP)[1][:, :N]


def air_parts(image_lead):
    """Each resonating part of the air: modes, level/dB, L-R level/dB, left leads/rad."""
    barrel, intake, housing, whoosh, jet, treble = columns(LEVELS, FRAME_S) + spin_db(FRAME_S, AIR_POWER)
    barrel_pan, intake_pan, housing_pan, intake_lead, housing_lead, nozzle_lead = columns(BEARING, FRAME_S)
    jet_pan, hiss_pan = follow(JET_SIDE, intake_pan), follow(HISS_SIDE, intake_pan)
    housing_hz, housing_width, nozzle_hz, nozzle_width, nozzle = columns(TURN, FRAME_S)
    ridge_pan, ridge_lead, flank, flank_pan, flank_lead = columns(FLANKS, FRAME_S)
    ridge_hz, ridge = columns(RIDGE, FRAME_S)
    pitch, lowest = columns(AIM, FRAME_S)
    low, high = columns(SHEEN, FRAME_S)
    shifted_barrel = [(hz * pitch, width, db) for hz, width, db in BARREL]
    return [(shifted_barrel, barrel, barrel_pan, follow(BARREL_LEAD, barrel_pan)),
            (LOWEST, barrel + lowest, follow(LOWEST_SIDE, barrel_pan), image_lead),
            (INTAKE, intake, intake_pan, intake_lead),
            ([(housing_hz, housing_width, 0)], housing, housing_pan, housing_lead),
            ([(nozzle_hz, nozzle_width, 0)], jet + nozzle, jet_pan, nozzle_lead),
            ([(ridge_hz, RIDGE_WIDTH_HZ, 0)], jet + ridge, ridge_pan, ridge_lead),
            (FLANK, jet + flank, flank_pan, flank_lead),
            (SHEEN_LOW, treble + low, 0, image_lead),
            (SHEEN_HIGH, treble + high, 0, image_lead),
            (WHOOSH, whoosh, 0, image_lead),
            (JET, jet - 2, jet_pan, JET_LEAD),  # broad jet, 2 dB under the jet level
            (HISS, treble + HISS_DB, hiss_pan, image_lead),
            (FIZZ, treble + FIZZ_DB, 0, image_lead)]


def airflow():
    """Turbulent air over the background; slow random unevenness colours the air in patches."""
    image_lead = columns(STEREO, HZ)[0][:, None]
    power, cross = 0, 0
    for modes, db, pan, lead in air_parts(image_lead):
        shape = ringing(modes)
        power = power + shape * sides(db, pan)[:, None] ** 2
        cross = cross + shape * gain_of(db) ** 2 * np.exp(1j * lead)
    patch_db = PATCH_DB * with_the_hand(drifting(0.072, 250))
    unrest_db = 0.65 * drifting(0.052, 500)
    flicker_db = 1.63 * drifting(0.018, 2200) * np.clip(HZ / 12000, 0, 1)[:, None]  # gusts shake the treble most
    colour = gain_of(patch_db + unrest_db + flicker_db) ** 2
    place = background()
    return noise(power * colour + place, cross * colour + place * np.exp(1j * image_lead))


def scene():
    """All sources at the two ports; the background comes in with the airflow."""
    return puffs() + ripple() + squeal() + motor() + airflow()


def record(dry):
    """The band limit of the recorder: a steep low-pass."""
    lowpass = signal.firwin(1023, EDGE_HZ, window=("kaiser", 9), fs=SR)
    return signal.oaconvolve(dry, lowpass[None], "same")


dry = scene()
out = record(dry)
bounce(out)
```